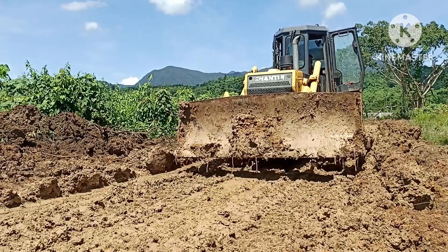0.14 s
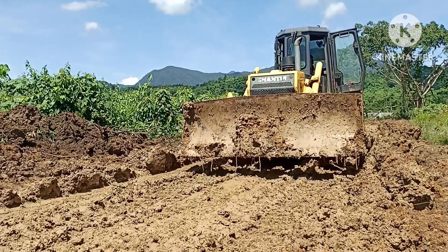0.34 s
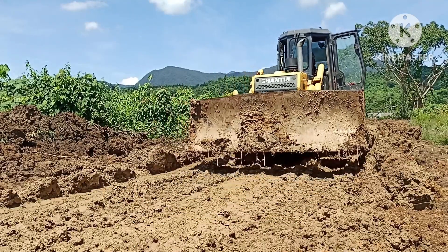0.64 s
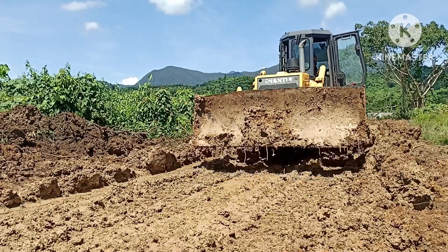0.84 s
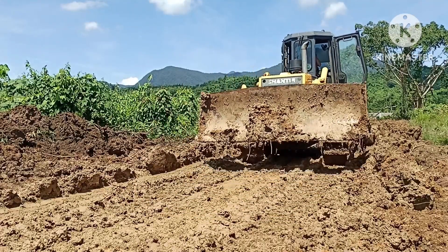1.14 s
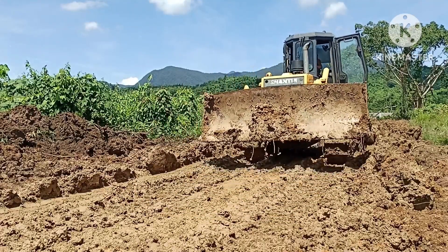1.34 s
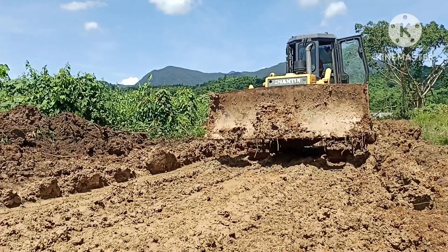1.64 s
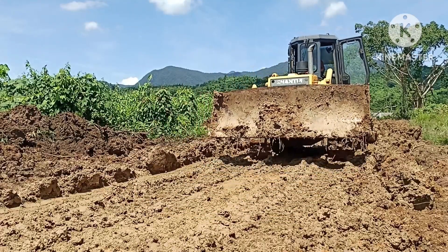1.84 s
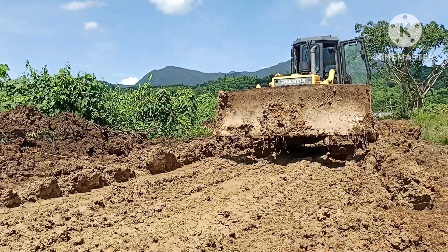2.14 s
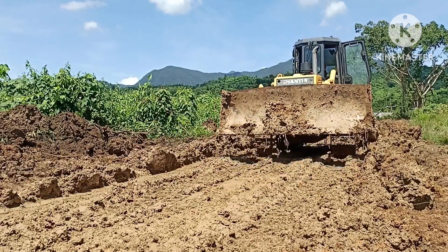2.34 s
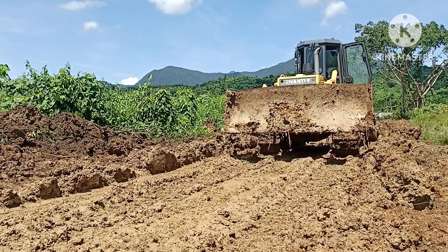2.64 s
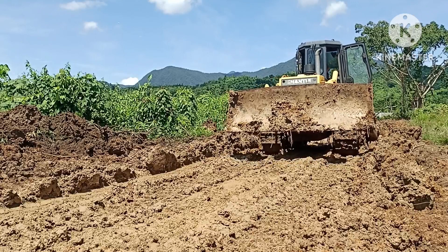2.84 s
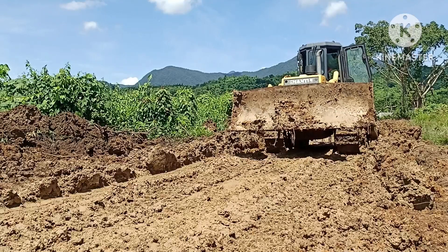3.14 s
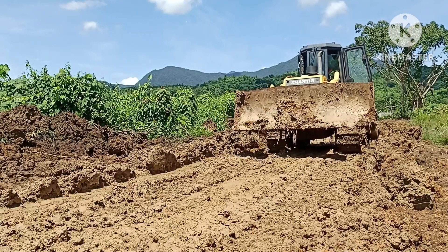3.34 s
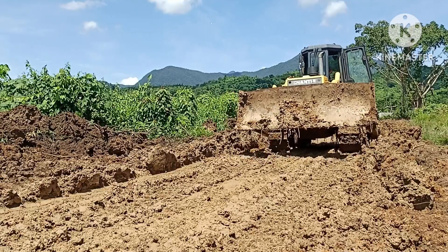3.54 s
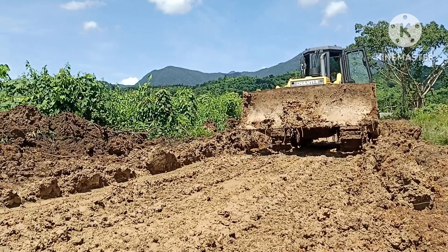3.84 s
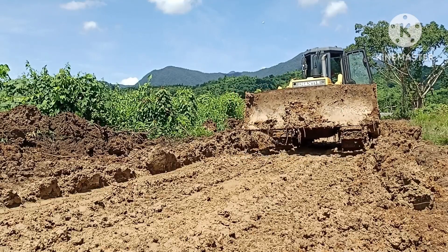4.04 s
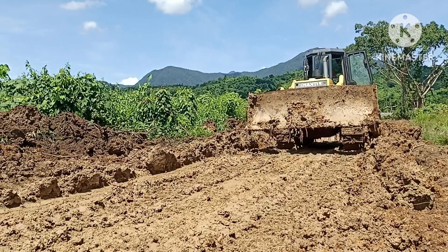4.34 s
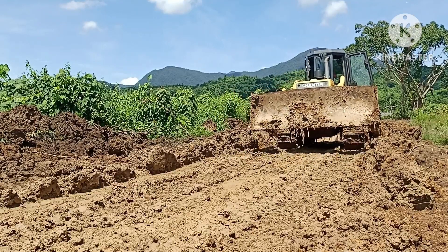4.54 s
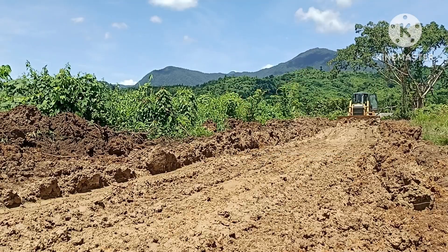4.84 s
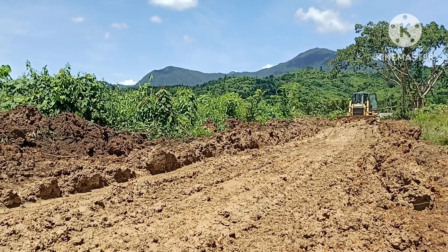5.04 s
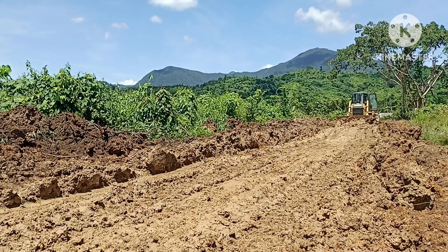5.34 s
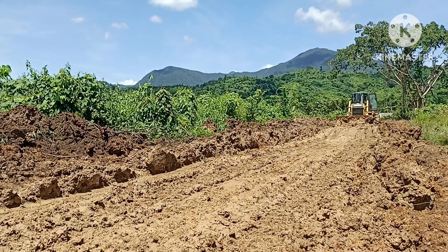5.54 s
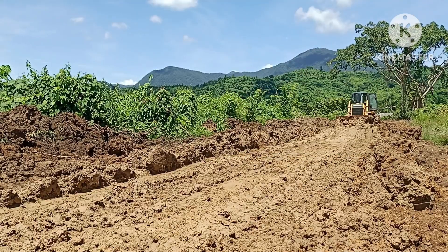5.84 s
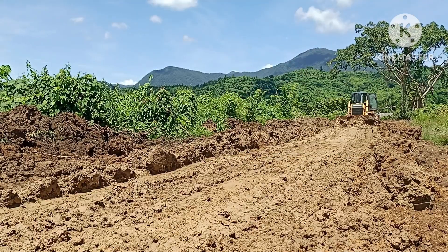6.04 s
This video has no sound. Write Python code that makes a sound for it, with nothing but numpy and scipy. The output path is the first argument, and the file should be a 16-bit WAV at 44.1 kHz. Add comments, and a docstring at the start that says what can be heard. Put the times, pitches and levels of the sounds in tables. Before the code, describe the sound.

A bulldozer's diesel engine roars close by with clattering steel tracks as it backs off over soil, then abruptly sounds much fainter and farther away.

```python
"""A crawler bulldozer backs away over soil at full throttle, heard outdoors by two close-set microphones.
At first near: engine-locked exhaust and fan tones, a roar of shaped noise, turbocharger hiss in a narrow moving
band, steel clatter from struck resonators, clinks as dying noise bursts, and grit as treble noise in clumps.
After five seconds a short crossfade jumps to the machine far off: fainter tones, hiss and brief narrow hums,
with a roar whose middle range is cancelled by the ground echo."""
import sys
import numpy as np
from scipy import signal
from scipy.fft import rfft, irfft, next_fast_len
from scipy.io import wavfile
from scipy.ndimage import uniform_filter1d

SR = 44100
rng = np.random.default_rng(int(sys.argv[2]) if len(sys.argv) > 2 else 0)


def volts_from_db(level):
    """Convert decibel levels to linear amplitude ratios."""
    exponent = np.asarray(level, float) / 20
    return 10 ** exponent


def int16_out(signal):
    """Quantize to a 16-bit WAV file."""
    q = np.round(np.clip(np.atleast_2d(signal).T, -1, 1) * 32767)
    wavfile.write(sys.argv[1], SR, q.astype(np.int16))


N = 272097
SIZE = next_fast_len(N + 4096)
T = np.arange(N) / SR
HZ = np.arange(SIZE // 2 + 1) * SR / SIZE + 1e-3
FRAME, HOP = 1024, 256
JUMP_S, FADE_S = 5.06, 0.18   # centre and length of the crossfade from near to far
SHAFT_PER_FIRING, FAN_PER_FIRING = 0.0977, 0.586   # rates relative to the firing rate


def rms_one(x):
    """Scale to unit power."""
    return x / np.sqrt(np.mean(x ** 2) + 1e-20)


def rms_scale(spectrum):
    """Rms in time of a spectrum."""
    return np.sqrt(np.mean(irfft(spectrum, SIZE) ** 2))


def in_time(rows):
    """Columns of a table, one value per sample."""
    s, *columns = np.transpose(rows)
    return [np.interp(T, s, c) for c in columns]


def at_hz(points):
    """A spectrum table read on the FFT grid, linear in log frequency."""
    hz, value = np.transpose(points)
    return np.interp(np.log(HZ), np.log(hz), value)


def bump(hz, centre_hz, width_hz):
    """Resonance curve of unit height; width at half height."""
    return 1 / (1 + (2 * (hz - centre_hz) / width_hz) ** 2)


def swells(rows):
    """Sum of smooth bumps, each with its centre, length and height."""
    return sum(volts_from_db(db) * np.exp(-2 * ((T - s) / length_s) ** 2) for s, length_s, db, *_ in rows)


def drift(rate_hz):
    """Slow chance with spread 1: noise through a double pole, run at every 64th sample."""
    r = np.exp(-128 * np.pi * rate_hz / SR)
    slow = signal.lfilter([1], [1, -2 * r, r * r], rng.standard_normal(N // 64 + 2002))[2000:]
    return np.interp(np.arange(N) / 64, np.arange(len(slow)), rms_one(slow - slow.mean()))


def patches(shape, width_hz, length_s):
    """Random blotches over frequency and time, spread 1."""
    field = rng.standard_normal(shape)
    for axis, size in enumerate([width_hz * FRAME / SR, length_s * SR / HOP]):
        for _ in range(2):
            field = uniform_filter1d(field, max(round(size), 1), axis=axis)
    return rms_one(field)


def pair(alike):
    """Spectra of two white noises with a given likeness (0-1)."""
    alike = np.clip(alike, 0, 1)
    mid, side = rfft(rng.standard_normal((2, SIZE)))
    return (np.sqrt(1 + alike) * mid + np.sqrt(1 - alike) * side * [[1], [-1]]) / np.sqrt(2)


def narrow_hiss(course, width_hz, alike, flicker_db):
    """Narrow band of noise: two lowpassed noises carried in quadrature on a moving pitch."""
    centre_hz, level_db = in_time(course)
    a, b = (rms_one(irfft(pair(alike) / (1 + (HZ / width_hz) ** 6), SIZE)[:, :N]) for _ in range(2))
    phase = 2 * np.pi * np.cumsum(centre_hz) / SR
    return volts_from_db(level_db + flicker_db * drift(15.0)) * (a * np.cos(phase) + b * np.sin(phase))


def grit(low_hz, high_hz, flicker_db):
    """Soil and track rattle in the top octave, thinning once the blade has shed its soil; soil falls in clumps."""
    # steady grit: (time [s], rms [dB])
    grit_level = [(0, -60), (1, -65), (2.1, -64), (2.7, -65.5), (3.2, -77), (5, -76), (5.15, -85),
                  (6.17, -83)]
    # clumps of falling soil: (centre [s], length [s], rms [dB])
    clumps = [(.05, 0.052, -59.5), (.18, 0.1, -65), (.55, 0.065, -61), (.83, 0.049, -58),
              (1.21, 0.065, -64), (2.05, 0.065, -64), (2.63, 0.055, -57.5), (2.74, 0.024, -64),
              (4.79, 0.042, -70)]
    band = pair(alike=0.11) / (1 + (low_hz / HZ) ** 80) / (1 + (HZ / high_hz) ** 80)
    level = volts_from_db(in_time(grit_level)[0] + flicker_db * drift(12.0)) + swells(clumps)
    return rms_one(irfft(band, SIZE)[:, :N]) * level


def far_hums(width_hz):
    """Short swells of narrow noise inside the cancelled range, each on its own pitch."""
    # hums: (centre [s], length [s], rms [dB], pitch [Hz])
    hums = [(5.28, .09, -58, 717), (5.372, 0.043, -59, 684), (5.495, 0.11, -56.5, 717),
            (5.758, 0.044, -62, 723)]
    return sum(swells([row]) * narrow_hiss([(0, row[3], 0)], width_hz, alike=0.88, flicker_db=6.0)
               for row in hums)


def turbo_hiss(course, width_hz, alike, flicker_db):
    """Turbocharger air noise: a narrow band on a gliding centre."""
    return narrow_hiss(course, width_hz, alike, flicker_db)


def clinks(low_hz, decay_s, trim_db):
    """Steel track links meet: short bright noise bursts that die fast."""
    # loudest links; weaker ones come at random: (time [s], level before trim [dB])
    loudest = [(0.1132, -42.5), (0.3222, -45.5), (0.432, -38.5), (1.1039, -49), (1.1713, -44),
               (1.9191, -41), (1.9984, -40.5), (2.388, -42), (2.4424, -39.5), (2.5496, -45.5)]
    weak_per_s, weak_db, weak_loss_db_per_s = 3.5, -48, 3   # level before trim
    weak = (rng.random(N) < weak_per_s / SR) & (T < JUMP_S)
    strikes = weak * volts_from_db(weak_db - weak_loss_db_per_s * T + 3 * rng.standard_normal(N) + trim_db)
    strikes[[round(s * SR) for s, db in loudest]] = volts_from_db(np.array(loudest)[:, 1] + trim_db)
    dying = signal.lfilter([1], [1, -np.exp(-1 / (decay_s * SR))], strikes + 1e-18)
    bright = pair(alike=0.15) / (1 + (low_hz / HZ) ** 4)
    return dying * rms_one(irfft(bright, SIZE)[:, :N])


def hood_ring():
    """A sheet of the hood sings on one slightly moving pitch: very narrow noise."""
    # ring: (time [s], pitch [Hz], rms [dB])
    ring = [(0, 914, -41), (.55, 915, -40.5), (1.1, 911, -47), (2.2, 904, -51), (3.5, 908, -52),
            (5, 909, -47)]
    return narrow_hiss(ring, width_hz=7.7, alike=0.9, flicker_db=1.0)


def clatter(levels, low_hz, high_hz):
    """Dense uneven taps of steel, dealt to short rings spread in pitch; the microphones share part of them."""
    taps_per_s, spread_db, cycles_to_60_db = 900, 1.5, 41
    sizes = volts_from_db(spread_db * np.minimum(rng.exponential(1, (3, N)), 5)) * rng.choice([-1, 1], (3, N))
    taps = sizes * (rng.random((3, N)) < taps_per_s / SR)
    taps = taps[0] + 1.2 * taps[1:]   # shared + own
    dealt = rng.integers(0, 12, N)
    rings = 0
    for k, hz in enumerate(np.geomspace(low_hz, high_hz, 12)):
        r = volts_from_db(-60 * hz / (cycles_to_60_db * SR))
        w = 2 * np.pi * hz / SR
        poles = [1, -2 * r * np.cos(w), r * r]
        rings = rings + signal.lfilter([1, 0, -1], poles, taps * (dealt == k) + 1e-18)
    return volts_from_db(in_time(levels)[0]) * rms_one(rings)


def whine(phase):
    """A thin tone at eight times the firing rate that comes and goes."""
    # swells: (centre [s], length [s], rms [dB])
    whine_swells = [(.47, 0.074, -43), (.71, 0.06, -31.5), (1.68, 0.15, -42), (1.86, 0.11, -35),
                    (2.07, 0.0549, -41.5), (3.55, 0.44, -49), (4.3, 0.76, -56)]
    return np.sqrt(2) * swells(whine_swells) * np.sin(8 * phase)


def fan_shaft(phase):
    """Unequal fan blades sound at shaft multiples; the tenth beats with the firing tone about 3 times a second."""
    # lines: (multiple of shaft rate, rms [dB])
    shaft_lines = [(9, -45), (11, -54), (13, -36.5), (14, -53.5), (15, -53.5), (16, -40), (24, -45.5),
                   (26, -47), (30, -46.5), (36, -49)]
    tenth_db, fade_from_s, fade_db_per_s = -35.5, 3.4, 13.5
    beat_per_firing, beat_start_turns = 0.024, 0.027
    slip = beat_per_firing * (phase - phase[0]) + 2 * np.pi * beat_start_turns
    level_db = tenth_db - fade_db_per_s * np.maximum(T - fade_from_s, 0)
    sound = np.sqrt(2) * volts_from_db(level_db) * np.sin(phase - slip)
    for k, db in shaft_lines:
        line_phase = k * SHAFT_PER_FIRING * phase + 2 * np.pi * rng.random()
        sound = sound + np.sqrt(2) * volts_from_db(db + 3.1 * drift(3.1)) * np.sin(line_phase)
    return sound


def sharp_rises():
    """Level curve of random, uneven sharp rises with a short decay; mean 0, spread 1."""
    per_s, decay_s = 35, 0.0062
    hits = (rng.random(N) < per_s / SR) * rng.exponential(1, N)
    dying = signal.lfilter([1], [1, -np.exp(-1 / (decay_s * SR))], hits + 1e-18)
    return rms_one(dying - dying.mean())


def cycle_noise(phase, repeats):
    """Valves and injectors strike alike on every engine cycle: part of the noise is a loop six firings long."""
    # likeness of the two microphones without the lag: (frequency [Hz], likeness [0-1])
    likeness = [(60, .99), (300, 0.97), (700, 0.93), (1500, 0.8), (3000, 0.7), (6000, 0.35), (9000, .3)]
    pattern = rng.standard_normal(2048)
    looped = np.zeros(SIZE)
    looped[:N] = pattern[(phase / (12 * np.pi) * 2048).astype(int) % 2048]
    share = np.clip(repeats, 0, 1)
    return np.sqrt(1 - share) * pair(at_hz(likeness)) + np.sqrt(share) * rfft(looped)


def roar(course, colour, panels, echo, phase, repeats, patchy_db, treble_patchy_db, width_hz, length_s,
         throb_depth, band_hz):
    """Combustion and air noise, varying in random blotches; the top throbs with firing, fan and random bursts."""
    rise_weight, flicker_db, flicker_hz = 2.8, 0.8, 8.2
    lift_db = sum(db * bump(HZ, centre, width) for centre, width, db in panels)
    noise = cycle_noise(phase, repeats) * volts_from_db(at_hz(colour) + lift_db)
    noise = noise / rms_scale(noise * ((HZ > band_hz[0]) & (HZ < band_hz[1])))
    throb = np.cos(phase) + 1.1 * np.cos(FAN_PER_FIRING * phase) + rise_weight * sharp_rises()
    upper = irfft(noise / (1 + (1000 / HZ) ** 2), SIZE)[:, :N]
    throbbing = irfft(noise, SIZE)[:, :N] + throb_depth * throb * upper
    hz, s, cells = signal.stft(throbbing, SR, nperseg=FRAME, noverlap=FRAME - HOP)

    hz = hz[:, None]
    at = np.minimum((s * SR).astype(int), N - 1)
    level_db, dulling, bass_db, ground_db = (c[at] for c in in_time(course))
    octaves = np.log2(hz / 1000 + 1e-3)   # from 1 kHz
    treble = np.clip(octaves - 1, 0, 1)   # rises from 2 to 4 kHz
    gain_db = level_db - dulling * np.maximum(octaves, 0) + bass_db * np.clip(-1 - octaves, 0, 1)
    gain_db = gain_db + ground_db * np.exp(-(octaves + 1) ** 2 / 0.3)
    progress = np.clip((s - course[0][0]) / (course[-1][0] - course[0][0]), 0, 1)
    for centre, width, first_db, last_db in echo:
        gain_db = gain_db + (first_db + (last_db - first_db) * progress) * bump(hz, centre, width)
    # the treble level flickers at random
    gain_db = gain_db + flicker_db * treble * drift(flicker_hz)[at]
    blotch_db = patchy_db * np.clip(octaves + 2.53, 0, 1) + treble_patchy_db * treble
    gain_db = gain_db + blotch_db * patches(gain_db.shape, width_hz, length_s)
    return signal.istft(cells * volts_from_db(gain_db), SR, nperseg=FRAME, noverlap=FRAME - HOP)[1][:, :N]


def tones(speed, lines, span_s, waver_cycles):
    """Exhaust and fan lines tied to engine speed, wavering with air and load; also returns the firing phase."""
    turning = 2 * np.pi * np.cumsum(in_time(speed)[0]) / SR
    firing_phase = None   # set by the first line, the firing tone
    sound = 0
    for multiple, *levels_db, waver_db in lines:
        if multiple in (2, 3, 4):   # overtones of one exhaust pulse, locked to the firing tone
            phase = multiple * firing_phase + np.pi
        else:
            waver = waver_cycles * np.sqrt(multiple) * drift(2.3)
            phase = multiple * turning + 2 * np.pi * (rng.random() + waver)
        if firing_phase is None:
            firing_phase = phase
        level_db = np.interp(T, span_s, levels_db) + waver_db * drift(4.0)
        sound = sound + np.sqrt(2) * volts_from_db(level_db) * np.cos(phase)
    return sound, firing_phase


def arrive(x, lag_s, left_lift):
    """The machine stands to the right: the left channel is late and has its own tone colour."""
    late = np.exp(-2j * np.pi * HZ * lag_s)
    left = irfft(rfft(x[0], SIZE) * volts_from_db(at_hz(left_lift)) * late, SIZE)[:N]
    return np.array([left, x[1]])


def far_machine():
    """The machine far off: the ground echo cancels the middle of the roar's spectrum."""
    # engine speed: (time [s], firing rate [Hz])
    speed = [(5.1, 142.3), (6.17, 141.6)]
    # tones: (multiple of firing rate, rms at each time of span_s [dB] x 3, waver [dB])
    lines = [(1, -34.5, -34, -35, 1.2), (2, -39, -42, -37, 1.2), (.586, -44.5, -44, -45, 1.2),
             (1.172, -37, -43, -46, 1.2), (1.758, -43, -43.5, -40.5, 1.2), (1.6, -46, -48, -47.5, 2.5),
             (1.2, -47, -48.5, -52.5, 2.5)]
    # roar colour: (frequency [Hz], relative density [dB])
    colour = [(25, -7), (50, -16), (80, 10), (130, 14), (280, 11.5), (360, 0.5), (450, -20), (1000, -22),
              (1200, -8), (2450, -11), (2800, -15.5), (7000, -29), (8500, -41), (9500, -67)]
    # hood and blade panels: (centre [Hz], width [Hz], lift [dB])
    panels = [(1240, 72, 3.5), (1443, 100, 7.5), (1550, 82, -3.5), (1900, 200, 12), (2030, 160, 3.5),
              (2280, 120, 7), (5230, 510, 1.5), (6730, 530, 4)]
    # moving ground echo: (centre [Hz], width [Hz], lift at start [dB], lift at end [dB])
    echo = [(900, 300, -3.5, 7), (1330, 200, -1.5, -1), (1620, 200, 2.5, 1)]
    # turbocharger: (time [s], centre [Hz], rms [dB])
    turbo = [(5.14, 11600, -77), (5.55, 11750, -73.5), (6.17, 12100, -80)]
    # left minus right microphone: (frequency [Hz], level [dB])
    left_lift = [(60, -2.2), (290, 0.5), (640, 0), (1400, 0), (3100, 1.5), (6800, 2.5), (15000, 6)]
    span_s = (5.1, 5.6, 6.17)
    hum, phase = tones(speed, lines, span_s, waver_cycles=0.02)
    course = np.transpose([
        span_s[::2],
        (-43.5, -43),   # level [dB]
        (0.5, 1.25),    # dulling above 1 kHz [dB per octave]
        (2, 0.5),       # lift below 250 Hz [dB]
        (-5.5, -4)])    # ground echo around 500 Hz [dB]
    far = hum + roar(course, colour, panels, echo, phase, repeats=0.05, patchy_db=2.3, treble_patchy_db=1.0,
                     width_hz=120, length_s=0.04, throb_depth=0.025, band_hz=(1100, 2600))
    far = far + turbo_hiss(turbo, width_hz=230, alike=0.1, flicker_db=2.0) + far_hums(width_hz=44)
    return arrive(far, 0.00015, left_lift)


def near_machine():
    """The machine close by: engine speed sags under load, then recovers; clatter thins as it backs away."""
    # engine speed: (time [s], firing rate [Hz])
    speed = [(0, 128.8), (.55, 128), (.8, 125.8), (1.2, 125.9), (1.6, 127.9), (1.87, 124.8), (2.1, 127),
             (2.4, 128.5), (3.1, 128.3), (3.4, 130.1), (4.0, 130.1), (5.1, 129.9)]
    # tones: (multiple of firing rate, rms at each time of span_s [dB] x 7, waver [dB])
    lines = [(1, -23, -23, -21.5, -22, -24, -24.5, -23.5, 0.79),
             (2, -38.5, -36.5, -38, -29.5, -31, -34, -34.5, 1.37),
             (3, -39.5, -37.5, -40, -37, -42.5, -44, -40.5, 1.8),
             (4, -40, -40, -43, -45, -49, -48.5, -53, 1.3),
             (.586, -28, -28.5, -27, -28, -32.5, -32, -35.5, 0.74),
             (1.174, -27, -28.5, -25, -28.5, -25, -22.5, -28, .8),
             (1.758, -41.5, -40, -40, -42, -55, -39, -44, 3.2)]
    # roar colour: (frequency [Hz], relative density [dB])
    colour = [(25, -8), (45, -11), (65, 2.5), (110, 12), (170, 11), (300, 1), (600, 2.5), (1000, -3),
              (1900, -5), (2550, -10), (2800, -17), (4600, -19.5), (7400, -25), (8200, -30.5), (8550, -55),
              (10500, -73)]
    # hood and blade panels: (centre [Hz], width [Hz], lift [dB])
    panels = [(216.4, 24, 5), (286.7, 32, 9.5), (527, 51, 2.5), (950, 27, 2.5), (1253, 72, 3),
              (1675, 50, 4.5), (1857, 72, 4.5), (1970, 92, 1.5), (2386, 120, 5.5), (5340, 450, 3.5),
              (6800, 520, 3)]
    # ground echo, shifting as the machine moves: (centre [Hz], width [Hz], lift at start [dB], at end [dB])
    echo = [(450, 60, 3.5, 2.5), (715, 90, -0.5, 5.5), (785, 69, -1.5, 0.7), (980, 78, 4.3, -3.5),
            (1450, 80, 0.5, -1), (3130, 500, 6, 1), (4530, 500, -0.5, -5.5), (6040, 240, 0.3, -3)]
    # times of the roar course: (time [s], ..)
    roar_span_s = (0, 2.5, 4, 5)
    # turbocharger: (time [s], centre [Hz], rms [dB])
    turbo = [(0, 9600, -60), (1, 9750, -59.5), (2.2, 9930, -58), (3.1, 9700, -61.5), (3.7, 9450, -64),
             (5, 9380, -64)]
    # tracks and rollers: (time [s], rms [dB])
    track_levels = [(0, -41.5), (.15, -39.5), (.35, -43), (.5, -43.5), (.95, -54.5), (1.2, -48),
                    (1.45, -61.5), (1.85, -44.5), (2.05, -47.5), (2.3, -52), (2.48, -43.5), (2.53, -53),
                    (2.6, -37.5), (2.7, -57), (3.0, -67), (5, -59)]
    # duller rattle of hood and blade: (time [s], rms [dB])
    hood_levels = [(0, -38), (.8, -47), (2.5, -43.5), (5, -47.5)]
    # left minus right microphone: (frequency [Hz], level [dB])
    left_lift = [(110, -0.5), (200, 0.7), (380, -0.04), (2400, .4), (4400, 2.3), (6500, 1), (9000, -3.4),
                 (15000, 14.5)]
    span_s = (0, 0.8, 1.6, 2.3, 3.1, 3.9, 5)
    hum, phase = tones(speed, lines, span_s, waver_cycles=0.02)
    near = hum + fan_shaft(phase) + whine(phase) + hood_ring()
    course = np.transpose([
        roar_span_s,
        (-27.5, -30.5, -30, -31),     # level [dB]
        (-0.92, -1.15, 0.74, 0.17),   # dulling above 1 kHz [dB per octave]
        (-1.3, 1, -0.21, 0.32),       # lift below 250 Hz [dB]
        (2, -0.3, -3, -3.1)])         # ground echo around 500 Hz [dB]
    near = near + roar(course, colour, panels, echo, phase, repeats=0.08, patchy_db=1.5, treble_patchy_db=0.77,
                       width_hz=130, length_s=0.07, throb_depth=0.031, band_hz=(400, 2500))
    near = near + turbo_hiss(turbo, width_hz=300, alike=0.13, flicker_db=1.5)
    near = near + clinks(low_hz=9000, decay_s=0.008, trim_db=-8)
    near = near + clatter(track_levels, low_hz=2636, high_hz=4110)
    near = near + clatter(hood_levels, low_hz=1034, high_hz=1463)
    return arrive(near, 0.00009, left_lift)


def scene():
    """Near machine crossfades into far machine; grit runs through both."""
    share = np.clip((T - JUMP_S) / FADE_S + 0.5, 0, 1)
    machine = (1 - share) ** 1.5 * near_machine() + share * far_machine()
    return machine + grit(low_hz=10800, high_hz=14300, flicker_db=5.0)


def top_cut(x):
    """Nothing passes above the cut-off."""
    return signal.sosfilt(signal.butter(12, 16330, fs=SR, output="sos"), x)


def record(dry):
    """The microphone amplifier saturates softly, rounding the peaks."""
    overload = 0.55   # ceiling, full scale = 1
    mix = overload * np.tanh(dry / overload)
    return top_cut(mix)


dry = scene()
out = record(dry)
int16_out(out)
```